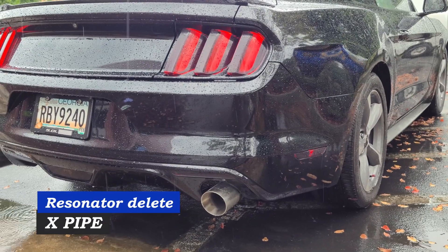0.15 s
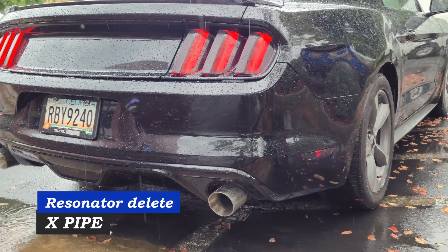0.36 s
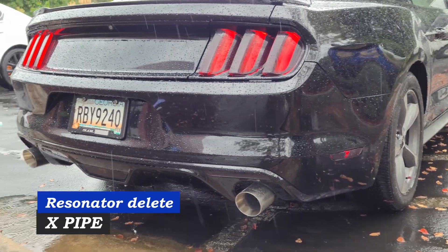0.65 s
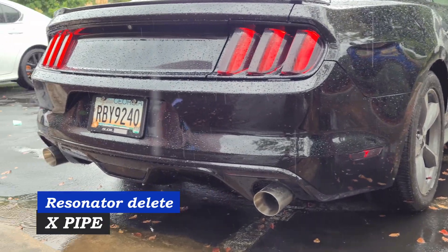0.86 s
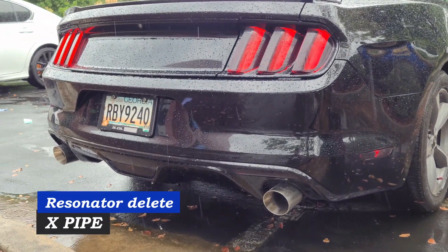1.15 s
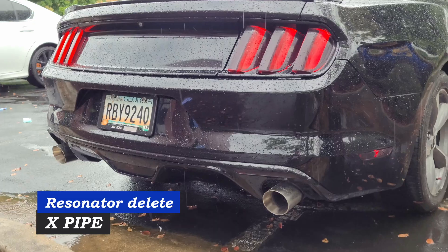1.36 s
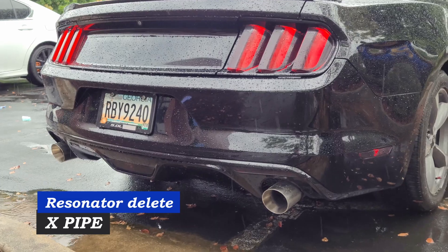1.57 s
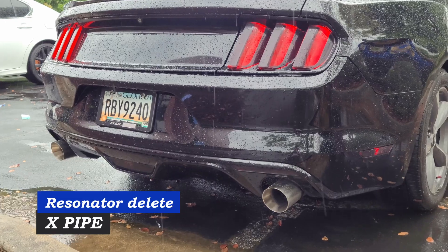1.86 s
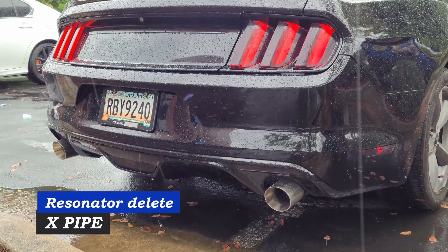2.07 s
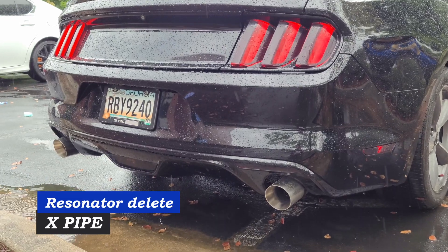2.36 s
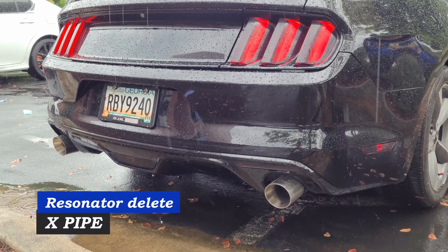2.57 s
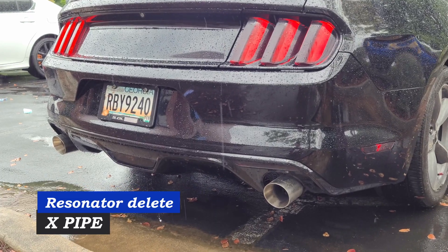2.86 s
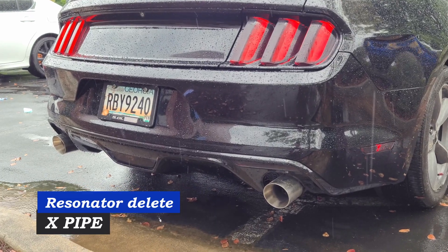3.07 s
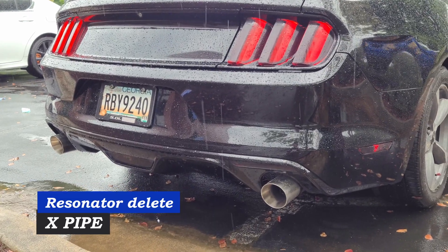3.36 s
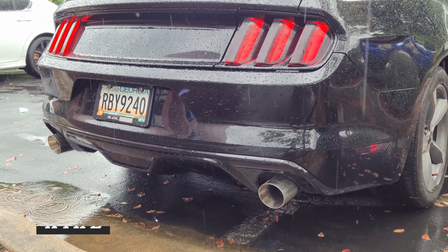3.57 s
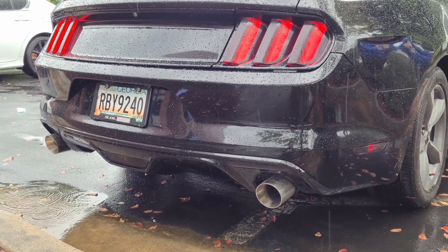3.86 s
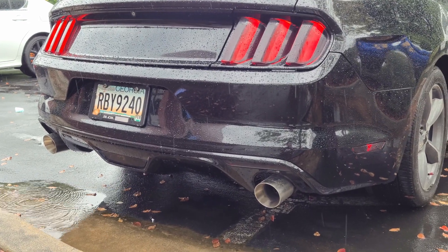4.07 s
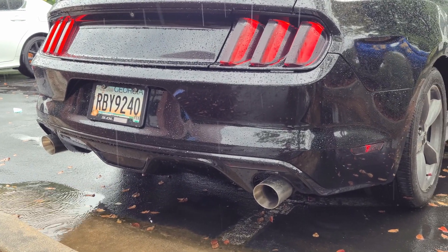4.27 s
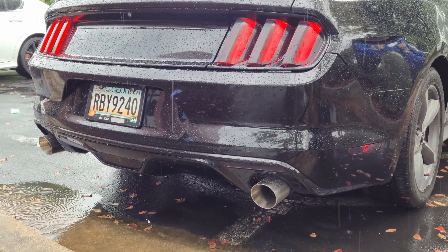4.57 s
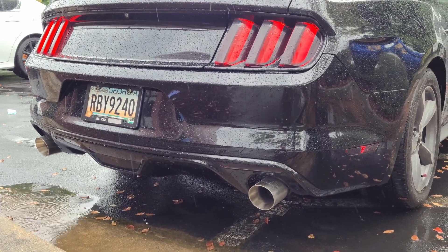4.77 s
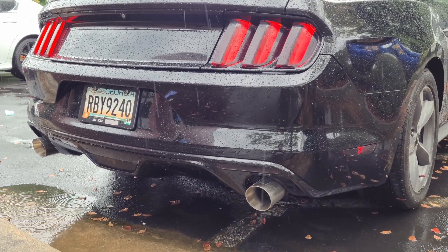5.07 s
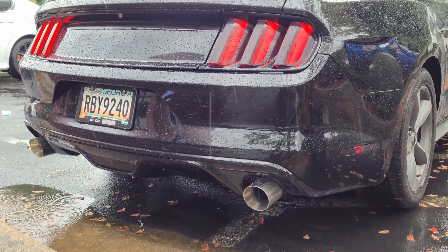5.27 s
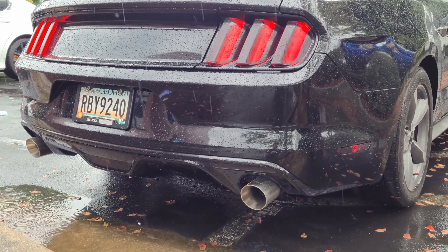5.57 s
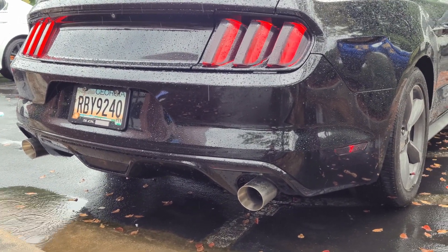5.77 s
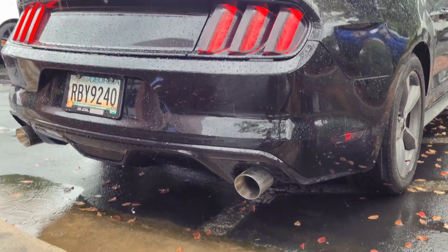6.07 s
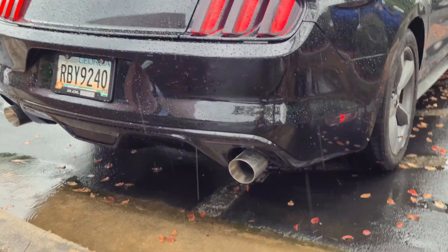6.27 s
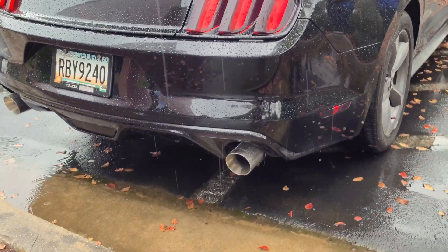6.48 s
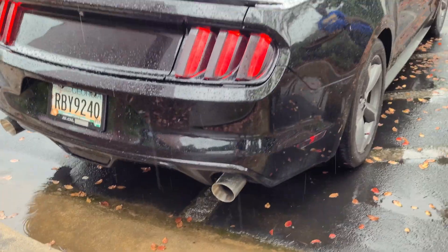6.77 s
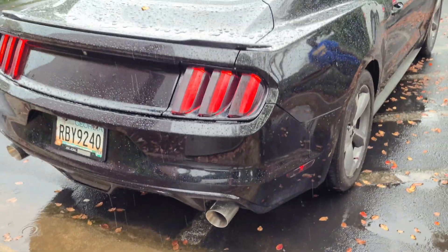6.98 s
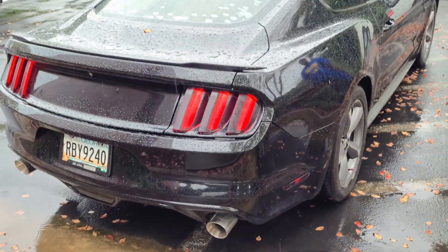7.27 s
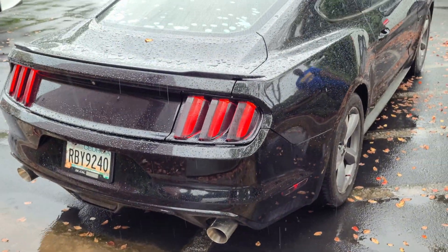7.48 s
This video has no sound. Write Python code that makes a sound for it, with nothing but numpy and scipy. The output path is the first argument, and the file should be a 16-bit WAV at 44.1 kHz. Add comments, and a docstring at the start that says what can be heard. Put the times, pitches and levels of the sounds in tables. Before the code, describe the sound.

A lumpy V8 with loud open exhausts settles from its starting flare to a rough, burbling idle, hissing and spitting at the tailpipes in rain.

```python
"""In a rainy parking lot, a cross-plane V8 with open twin exhausts settles from its starting flare to a lumpy idle.
Eight uneven firings ring the two pipes as a deep boom, with short barks and a growl above it.
Each firing also drives a puff of gas that cracks, hisses and spits at the tips.
Valve-train sizzle, a low rumble and raindrops lie behind; all of these but the boom, barks and cracks start as noise.
The microphone is behind the car and moves round to its flank in the last second and a half."""
import sys
import numpy as np
from scipy import signal
from scipy.fft import rfft, irfft
from scipy.io import wavfile
from scipy.ndimage import uniform_filter1d, minimum_filter1d

SR = 44100
rng = np.random.default_rng(int(sys.argv[2]) if len(sys.argv) > 2 else 0)


def store_wav(level_fs):
    """Save 16-bit WAV to argv[1]."""
    pcm = np.round(np.clip(np.atleast_2d(level_fs), -1, 1) * 32767)
    wavfile.write(sys.argv[1], SR, pcm.T.astype(np.int16))


N = 336924
TIME = np.arange(N) / SR  # seconds
FREQ = np.arange(N // 2 + 1) * SR / N  # Hz

# cylinders in firing order, with relative strengths: offset_ms, pulse_db, pulse_added_at_low_idle_db,
# gas_puff_db, gas_puff_added_at_flank_db, growl_db, hiss_db
CYLINDERS = [(-3.19, 1.8, -2.4, .5, 2.5, -5, 0), (-3.32, -.6, 1.7, 0, -1.5, 2, -.5),
             (-3.79, 2.4, .8, -11.5, -3, -3, -4), (-2.87, 2.5, -1.6, -1, 4, 4, 1.5),
             (-2.81, 2, -.8, -.5, 3, -1, -5), (-3.36, .1, -1.2, .3, -1, -4.5, -1.5),
             (-3.42, .6, .5, 1, 0, -5, 0), (-2.99, 2.4, -1.7, .5, 0, 2.5, -5)]
# surges of gas at the tips, with some spray: middle_s, half_length_s, surge_db, spray_level_db
SURGES = [(4.078, .12, 1.2, -54), (4.747, 0.033, 3.5, -44), (5.135, .07, 3.5, -39.5),
          (6.38, 0.06, 3.5, -50)]

IDLE_HZ, FLARE_HZ = 66.2, 82.6  # firings per second at the fast idle and near the top of the flare
STEP_DOWN_S, STEP_LENGTH_S = 3.62, 0.38  # the engine drops to its low idle, where it runs rougher
FLANK_FROM_S, FLANK_TO_S = 6.28, 7.0  # the microphone goes round the corner


def undb(db):
    """Turn decibels into gain."""
    return 10 ** (np.asarray(db) / 20)


def unit(x):
    """Scale to an average (rms) level of 1."""
    return x / np.sqrt(np.mean(x ** 2))


def filtered(x, response):
    """Pass a sound through a frequency response."""
    return irfft(rfft(x) * response, N)


def resonance(hz, width):
    """Response of one resonance, with gain 1 at its centre."""
    s = 1j * FREQ
    return width * s / (s * s + width * s + hz * hz)


def passband(low_hz, high_hz):
    """A second-order bass cut and a fourth-order treble cut."""
    low = 1j * FREQ / low_hz
    high = 1j * FREQ / high_hz
    bass_cut = low * low / (1 + np.sqrt(2) * low + low * low)
    return bass_cut / (1 + np.sqrt(2) * high + high * high) ** 2


def colour(points):
    """Response drawn through (Hz, dB) points."""
    hz, db = np.transpose(points)
    return undb(np.interp(np.log(FREQ + 1), np.log(hz), db))


def peaks(modes):
    """Steep-sided resonances of alternating sign, with dark valleys between them."""
    total = 0
    for k, (hz, width, db) in enumerate(modes):
        peak = resonance(hz, width)
        total = total + undb(db) * abs(peak) * peak * (-1) ** k
    return total


def gliding(x, response, scale):
    """A filter whose resonances all move in proportion to scale."""
    index = np.arange(N)
    clock = np.cumsum(scale)
    # stretch time, filter, then undo the stretch
    stretched = np.interp(index, clock, x)
    return np.interp(clock, index, filtered(stretched, response))


def clicks(times, sizes):
    """Single-sample impulses at the given times."""
    return np.bincount(np.round(times * SR).astype(int) % N, sizes, N)


def spread(mid, side, side_db, pan_db):
    """Left and right from a shared part and an opposed part; a positive pan favours the left."""
    ears = mid + undb(side_db) * side * np.array([[1], [-1]])
    return unit(ears) * undb(np.array([[pan_db], [-pan_db]]) / 2)


def air(side_db, pan_db):
    """Stereo turbulence: white noise."""
    return spread(*rng.standard_normal((2, N)), side_db, pan_db)


def ramp(start_s, length_s):
    """A steady change from 0 to 1."""
    return np.clip((TIME - start_s) / length_s, 0, 1)


def swell(middle_s, half_s):
    """A smooth rise to 1 and fall back."""
    return np.exp(-((TIME - middle_s) / half_s) ** 2)


def walk_round(behind, beside):
    """The microphone passes from behind the car to its flank: one sound fades into the other."""
    turn = ramp(FLANK_FROM_S, FLANK_TO_S - FLANK_FROM_S)
    return (1 - turn) * behind + turn * beside


def scattered(x, decay_s, share):
    """Bumper, underbody and wet ground return a short smear of echoes, different at each ear."""
    echoes = rng.standard_normal((2, N)) * np.exp(-TIME / decay_s) * (TIME > .001)
    echoes = echoes / np.sqrt(np.sum(echoes ** 2) / 2)
    return unit(x + share * filtered(x, rfft(echoes)))


def speed():
    """Firings per second, falling from the starting flare through a fast idle to the low idle."""
    # engine speed: time_s, firing_rate_hz
    speed_points = [(0.0, 81.57), (0.2, 82.86), (0.45, 77.73), (0.65, 73.5), (0.95, 70.29), (1.5, 68.96),
                    (2.25, 66.72), (3.0, 66.79), (3.6, 66.44), (3.8, 64.13), (4.15, 64.56), (4.5, 64.22),
                    (4.8, 63.56), (5.2, 63.88), (5.8, 63.8), (6.3, 64.06), (7.0, 64.69), (7.64, 65.06)]
    return np.interp(TIME, *np.transpose(speed_points))


def effort():
    """0 at idle and about 1 at the top of the flare."""
    return np.maximum(speed() - IDLE_HZ, 0) / (FLARE_HZ - IDLE_HZ)


def crankshaft():
    """Firings counted up to every moment; the shaft runs a little ahead and behind."""
    wander = unit(filtered(rng.standard_normal(N), passband(1, 4)))
    return np.cumsum(speed()) / SR + .012 * wander  # unsteadiness in firings


def firings(crank, jitter_ms, scatter_db, gas_scatter_db):
    """Time, bank and sizes of pulse, gas puff, growl and hiss per firing; each cycle nearly repeats the last."""
    # exhaust bank of each cylinder, in firing order: bank (0 or 1)
    bank_order = [0, 1, 1, 0, 1, 0, 0, 1]
    flare_scatter_db = 0.7  # added scatter between firings in the flare
    number = np.arange(int(crank[-1]))
    cylinder = number % len(CYLINDERS)
    offset_ms, pulse_db, low_idle_db, gas_db, flank_db, growl_db, hiss_db = np.array(CYLINDERS)[cylinder].T
    chance = rng.standard_normal((N // 500, 4))[number].T
    times = np.interp(number + .6, crank, TIME) + (offset_ms + jitter_ms * chance[0]) / 1000
    unsteady_db = scatter_db + flare_scatter_db * np.interp(times, TIME, effort())
    low_idle = np.interp(times, TIME, ramp(STEP_DOWN_S, STEP_LENGTH_S))
    burn_db = unsteady_db * chance[1] + low_idle_db * low_idle
    puff_db = gas_db + flank_db * np.interp(times, TIME, walk_round(0, 1)) + gas_scatter_db * chance[2]
    return (times, np.array(bank_order)[cylinder], undb(pulse_db + burn_db), undb(puff_db),
            undb(growl_db + burn_db), undb(hiss_db + gas_scatter_db * chance[3]))


def loudness(idle_db, flare_db, low_idle_db, flank_db, surge_share):
    """Gain of a layer: it follows the revs, the step to low idle, the microphone's place and the gas surges."""
    surges_db = sum(db * swell(s, half_s) for s, half_s, db, _ in SURGES)
    level_db = idle_db + flare_db * effort() + low_idle_db * ramp(STEP_DOWN_S, STEP_LENGTH_S)
    return undb(level_db + walk_round(0, flank_db) + surge_share * surges_db)


def flutter(depth_db):
    """Slow random unsteadiness of the gas flow."""
    return undb(depth_db * unit(filtered(rng.standard_normal(N), passband(2, 22))))


def puffs(times, sizes, rise_s, decay_s, steady):
    """Gas flow: a burst after each firing on top of a steady stream."""
    s = 2j * np.pi * FREQ
    bursts = filtered(clicks(times, sizes), 1 / (1 + s * rise_s) / (1 + s * decay_s))
    return unit(abs(steady) + unit(bursts))


def rumble():
    """Low noise round the car."""
    # colour of the rumble: pitch_hz, relative_level_db
    rumble_colour = [(10, -6.5), (30, -3.5), (60, 0.5), (140, 0), (280, 0.5), (450, -12), (800, -26),
                     (2000, -38.5), (6000, -61)]
    return unit(filtered(air(side_db=-5.5, pan_db=-1.0), colour(rumble_colour))) * undb(-31.5)


def rain(count=120):
    """Drops tick on the bodywork and the wet ground as tiny noise bursts: a few near, many faint."""
    # nearby raindrops: time_s, strength_db (before the noise and filter)
    near_drops = [(0.4823, -40), (0.4994, -45), (0.5332, -42), (1.0276, -49), (1.2765, -45), (2.9158, -47),
                  (2.9394, -48), (4.3994, -50), (4.5794, -47), (5.0594, -46), (5.457, -49), (6.4617, -45)]
    s, db = np.transpose(near_drops)
    chance = rng.random((count, 2)).T
    faint = clicks(chance[0] * N / SR, undb(-66 + 14 * chance[1]))
    splash = filtered(clicks(s, undb(db)) + faint, rfft(np.exp(-TIME / .0008)))
    return undb(6.0) * filtered(splash * air(side_db=-3, pan_db=3.5), passband(3500, 18000))


def hiss(times, sizes, points, steady, lag_s, pan_db):
    """Noise pulsing with the firings, with a fine spitting grain."""
    flow = puffs(times + 0.002, sizes, rise_s=0.00068, decay_s=0.0079, steady=steady) * flutter(1.3)
    grain = undb(2.0 * unit(filtered(rng.standard_normal(N), passband(4.3, 360))))
    left, right = scattered(flow * grain * air(side_db=-3, pan_db=pan_db), decay_s=0.0044, share=0.67)
    # the hiss reaches the left first
    ears = np.array([left, np.roll(right, int(lag_s * SR))])
    return unit(filtered(ears, colour(points)))


def valve_train(times, sizes):
    """The valve train sizzles: a high, steadier noise that swells briefly early in the turn."""
    # colour of the sizzle: pitch_hz, relative_level_db
    sizzle_colour = [(4000, -16.5), (7500, -0.5), (9500, -1.5), (12000, -2), (15500, -7)]
    # one row: idle_db, added_in_flare_db, added_at_low_idle_db, added_at_flank_db, surge_share (no unit)
    sizzle_level = (-58.5, 8, 0.5, 0.5, 0.5)
    sizzle = hiss(times, sizes, sizzle_colour, steady=2.5, lag_s=0.00029, pan_db=1.0)
    return sizzle * loudness(*sizzle_level) * undb(3.5 * swell(6.48, .11))


def gas_hiss(times, sizes):
    """Gas rushing from the tips hisses with every firing."""
    # colour of the gas hiss: pitch_hz, relative_level_db
    hiss_colour = [(1200, -24), (2100, -4.5), (2400, -1.5), (2550, -3), (2700, -2.5), (2930, 1.5),
                   (3300, -2), (3700, 2), (4300, 1), (5250, -8.5), (6000, -10), (7000, -9.5), (7900, -22),
                   (10000, -31.5)]
    # one row: idle_db, added_in_flare_db, added_at_low_idle_db, added_at_flank_db, surge_share (no unit)
    hiss_level = (-48, 2.8, 2.5, -0.8, 0.77)
    return hiss(times, sizes, hiss_colour, steady=0.8, lag_s=.00003, pan_db=-0.5) * loudness(*hiss_level)


def sputter(times, gas):
    """The gas surges blow a grainy, wet spray out of the tips."""
    level = sum(undb(db) * swell(s, half_s) for s, half_s, _, db in SURGES)
    grain = undb(2.5 * unit(filtered(rng.standard_normal(N), passband(20, 300))))
    flow = puffs(times, gas, rise_s=.001, decay_s=.008, steady=1) * grain
    return unit(filtered(flow * air(side_db=-4, pan_db=0), passband(1400, 2050))) * level


def rasp(times, gas):
    """Each puff cracks at the tailpipe tips; the resonances glide up as the microphone goes round the corner."""
    # tailpipe resonances from behind: pitch_hz, width_hz, relative_level_db
    rasp_behind = [(865, 66, -11.5), (1137, 220, 0), (1338, 100, 0), (1446, 85, 0.5), (1758, 250, -3)]
    # the same from the flank: pitch_hz, width_hz, relative_level_db
    rasp_flank = [(704, 180, -13.5), (842, 140, -2), (1050, 190, -3.5), (1332, 140, 2.5), (1790, 270, -3.5),
                  (2170, 350, -8.5)]
    # sharper spits from the tailpipes: time_s, strength_db (before the noise and filters)
    spit_times = [(0.046, -26), (0.341, -28), (1.106, -31), (2.566, -27.5), (3.044, -30), (3.1645, -31),
                  (3.2888, -29), (4.002, -31), (5.377, -31), (6.8944, -30), (7.03, -32), (7.244, -29)]
    # one row: idle_db, added_in_flare_db, added_at_low_idle_db, added_at_flank_db, surge_share (no unit)
    rasp_level = (-38.5, 3, 1.2, 4, 1.4)
    level = loudness(*rasp_level)
    flow = puffs(times + 0.002, gas, rise_s=0.0007, decay_s=0.0065, steady=0.55)
    crack = undb(-16.0) * unit(clicks(times + 0.003, gas))
    s, db = np.transpose(spit_times)
    # divided by the level that the whole rasp gets at the end
    spit = filtered(clicks(s, undb(db)), rfft(np.exp(-TIME / .003))) / level
    turbulence = air(side_db=-5.0, pan_db=2.0)
    burst = scattered((flow + spit) * flutter(1.3) * turbulence + crack, decay_s=0.0066, share=0.24)
    behind = unit(filtered(burst, abs(peaks(rasp_behind))))
    flank = abs(peaks(rasp_flank))
    glide = walk_round(1 - .15, 1)  # the flank resonances start this share lower
    beside = unit(np.array([gliding(ear, flank, glide) for ear in burst]))
    spray = undb(3.0) * filtered(spit * turbulence, passband(1700, 3200))
    return (walk_round(behind, beside) + spray) * level


def growl(times, sizes):
    """Turbulence behind each pulse rings the higher pipe resonances."""
    # higher pipe resonances: pitch_hz, width_hz, relative_level_db
    growl_modes = [(399, 31, -4), (452, 45, -1.5), (507.7, 51, -3), (590, 70, 0), (710, 150, -12)]
    # one row: idle_db, added_in_flare_db, added_at_low_idle_db, added_at_flank_db, surge_share (no unit)
    growl_level = (-44, 5, 1.5, -3, 0.3)
    flow = puffs(times, sizes, rise_s=0.001, decay_s=.006, steady=0.2)
    rung = filtered(flow * air(side_db=-12, pan_db=-0.5), peaks(growl_modes))
    return unit(rung) * loudness(*growl_level)


def bark(crank, scatter_db, detune):
    """Pulses of both banks meet in the pipes: a few short rings per cycle, with gaps between them: the lope."""
    # barks: place_in_cycle_firings, pitch_hz, then the strength in flare_db, fast_idle_db, low_idle_db, flank_db
    bark_rings = [(.85, 560, -35, -37, -34, -35), (1.6, 470, -27, -28, -23, -42),
                  (2.55, 415, -25, -36, -26.5, -35), (2.7, 275, -11, -70, -70, -70),
                  (3.1, 480, -26, -40, -27, -36), (3.55, 455, -36, -25.5, -27, -30),
                  (3.75, 760, -47, -47, -47, -36), (4.3, 550, -35, -26, -31, -29),
                  (4.7, 150, -13, -70, -70, -70), (5.2, 530, -36, -33, -32, -34),
                  (6.15, 500, -32, -32, -30, -33), (7.9, 460, -32, -23.5, -33, -33)]
    rise_cycles = 2.3  # cycles of its own pitch that a bark takes to reach its peak
    cycles = np.arange(0, crank[-1], len(CYLINDERS))
    # 0 flare, 1 fast idle, 2 low idle, 3 flank: which bark is loudest changes between them
    state = ramp(.5, .22) + ramp(STEP_DOWN_S, STEP_LENGTH_S) + walk_round(0, 1)
    age = TIME[:SR // 10]
    out = np.zeros(N + len(age))
    for place, hz, *db in bark_rings:
        rise = age * hz / rise_cycles
        shape = (rise * np.exp(1 - rise)) ** 2
        starts = np.interp(cycles + place, crank, TIME, right=np.inf) - rise_cycles / hz
        for s, (strength, pitch) in zip(starts, rng.standard_normal((len(cycles), 2))):
            if 0 <= s < TIME[-1]:
                i = int(s * SR)
                gain = np.interp(state[i], np.arange(len(db)), undb(db)) * undb(scatter_db * strength)
                ring = np.sin(2 * np.pi * hz * (1 + detune * pitch) * age)
                out[i:i + len(age)] += gain * shape * ring
    return out[:N]


def singing(barks):
    """The barks keep one narrow pipe resonance ringing, a different one at the flank."""
    behind = undb(5.5) * filtered(barks, resonance(577, 9))
    beside = undb(14) * filtered(barks, resonance(519, 6))
    return barks + walk_round(behind, beside)


def pipes(times, bank, sizes):
    """Each bank rings the standing waves in its own way: the uneven beat makes the V8 burble. Hot gas raises them."""
    # standing waves of the exhaust: pitch_hz, width_hz, then signed gains (no unit):
    # bank_1_behind, bank_0_behind, bank_1_flank, bank_0_flank
    pipe_modes = [(59.29, 12.0, 0.23, 0.28, 0.24, 0.31), (96.42, 5.7, 1.0, 0.89, 0.84, 0.86),
                  (122.8, 93.0, 0.17, 0.11, 0.12, 0.095), (122.8, 5.0, -0.44, -0.78, -0.63, -0.56),
                  (130.8, 21.0, -0.35, -0.03, -0.13, -0.15), (146.1, 7.2, -0.057, 0.24, -0.24, 0.22),
                  (161.7, 16.0, -0.41, -0.36, -0.47, -0.31), (200.6, 28.0, 0.081, -0.69, 0.35, -0.82),
                  (203.4, 22.0, -0.13, 0.67, -0.4, 0.82), (242.2, 18.0, -0.12, -0.12, -0.085, -0.0043),
                  (255.1, 6.0, -0.23, 0.039, -0.21, -0.071), (267.5, 12.0, 0.054, -0.2, 0.095, -0.1),
                  (287.2, 12.0, -0.015, 0.12, -0.013, 0.063), (315.6, 7.7, 0.083, 0.064, 0.046, 0.08),
                  (336.9, 8.6, -0.041, -0.015, -0.057, -0.11), (360.1, 24.0, -0.0051, 0.024, 0.013, 0.033)]
    # colour of the open tips: pitch_hz, level_db
    tip_colour = [(200, 0), (260, 1), (340, 1), (440, -2), (700, -10)]
    # how the harder pulses of the flare colour the boom: pitch_hz, level_db
    flare_colour = [(70, 6), (100, 10), (135, 0), (165, -10), (200, -4), (245, 3), (355, 9)]
    # one row: added_in_flare_db, added_at_low_idle_db, added_at_flank_db, surge_share (no unit)
    boom_changes = (-6.7, 0, 0, 0.1)
    modes = np.array(pipe_modes)
    waves = np.array([resonance(hz, width) for hz, width in modes[:, :2]])
    responses = modes[:, 2:].T @ waves * passband(45, 700) * colour(tip_colour)
    banks = [clicks(times, sizes * (bank == k)) for k in (1, 0)]
    heat = 1 + .026 * effort()  # share by which the hot gas of the flare raises the pitch above idle
    glide = heat / heat.mean()
    rung = [gliding(pulses, response, glide) for pulses, response in zip(banks + banks, responses)]
    behind = sum(rung[:2])
    behind = behind + effort() * (filtered(behind, colour(flare_colour)) - behind)
    boom = walk_round(behind, sum(rung[2:]))
    # shorter waves differ more between the ears
    side = filtered(boom, -colour([(60, -12.5), (130, -9.0), (280, 1.5)]))
    beat = spread(boom, side, side_db=-18, pan_db=0.45)
    return unit(beat * loudness(0, *boom_changes)) * undb(-12.0)


def scene():
    """Rumble and rain lie under an engine whose layers all follow the same crankshaft."""
    crank = crankshaft()
    times, bank, sizes, gas, growls, hisses = firings(crank, jitter_ms=0.06, scatter_db=0.5, gas_scatter_db=1.4)
    background = rumble() + rain()
    treble = valve_train(times, hisses) + gas_hiss(times, hisses)
    tips = sputter(times, gas) + rasp(times, gas)
    throat = growl(times, growls) + singing(bark(crank, scatter_db=1.1, detune=.012))
    # barks and growl soften as the flare dies away
    throat = throat * undb(-2 * swell(0.97, 0.45))
    return background + treble + tips + throat + pipes(times, bank, sizes)


def record(dry, hold_s=0.0029):
    """A fast limiter holds down the tallest pulses; the recorder cuts the top."""
    ceiling, top_hz = .8, 15500
    size = int(hold_s * SR)
    gain = np.minimum(1, ceiling / (abs(dry).max(axis=0) + 1e-9))
    gain = minimum_filter1d(gain, 2 * size)
    gain = uniform_filter1d(uniform_filter1d(gain, size), size)
    top_cut = signal.ellip(8, .2, 70, top_hz, fs=SR, output="sos")
    return signal.sosfilt(top_cut, dry * gain)


dry = scene()
out = record(dry)
store_wav(out)
```